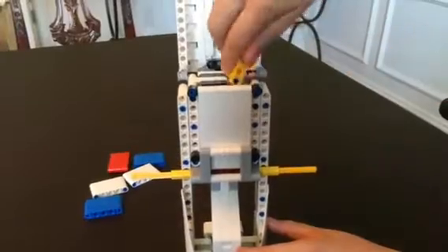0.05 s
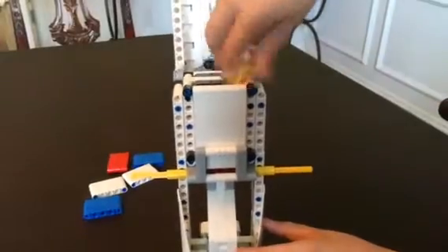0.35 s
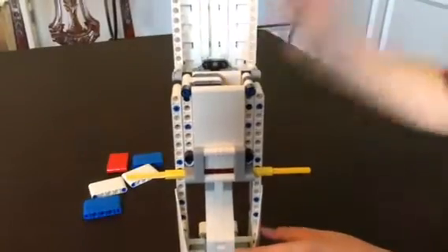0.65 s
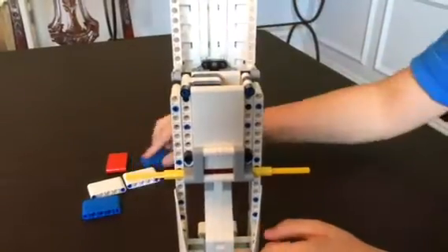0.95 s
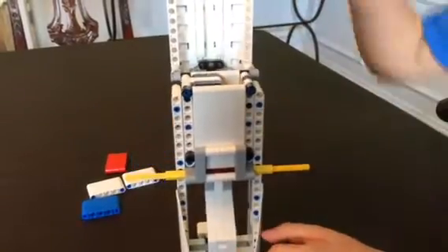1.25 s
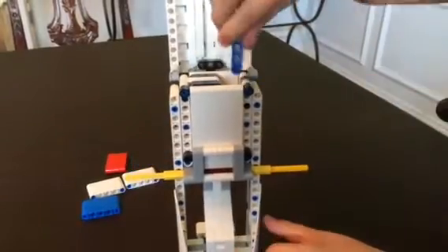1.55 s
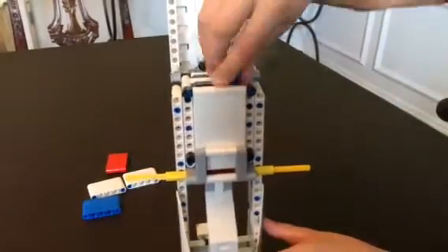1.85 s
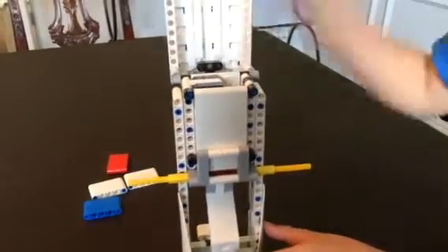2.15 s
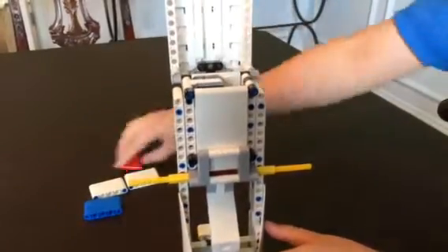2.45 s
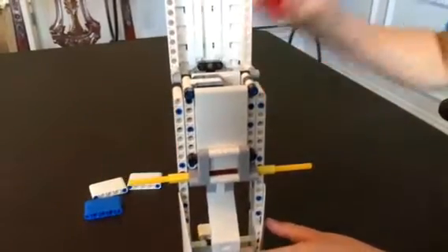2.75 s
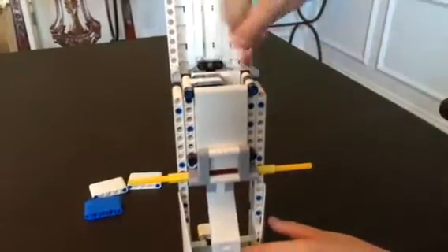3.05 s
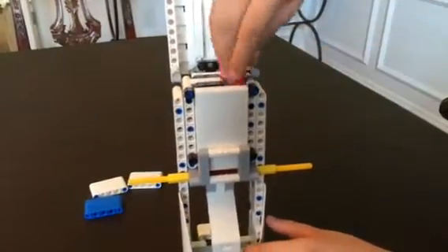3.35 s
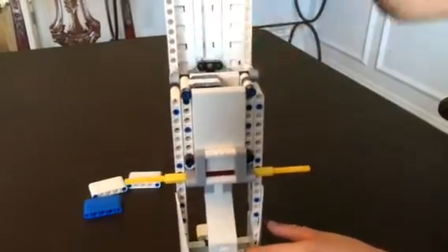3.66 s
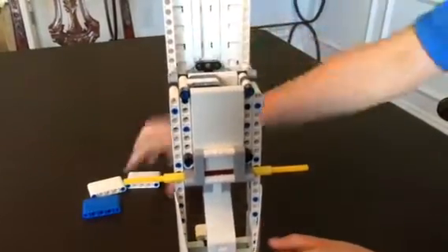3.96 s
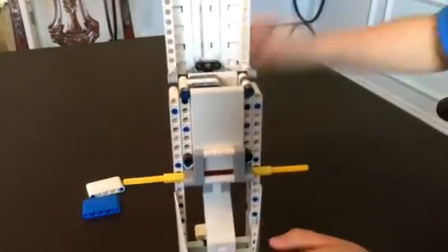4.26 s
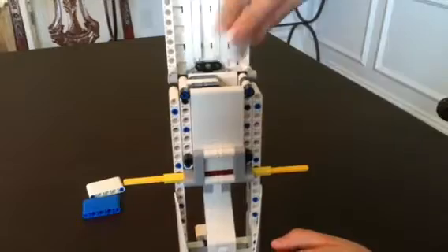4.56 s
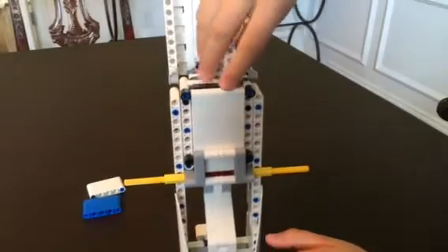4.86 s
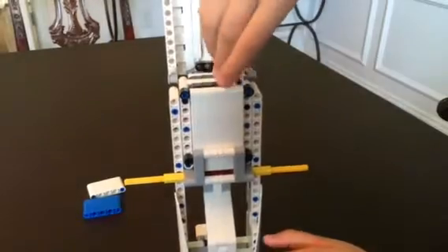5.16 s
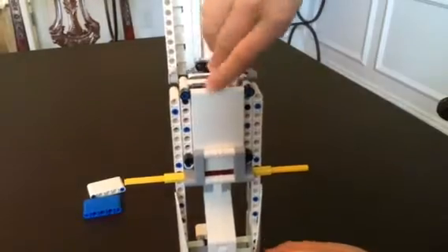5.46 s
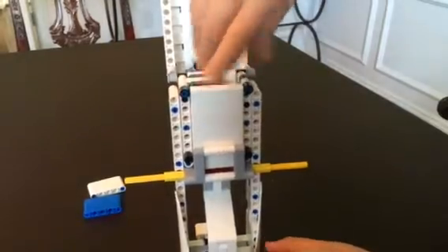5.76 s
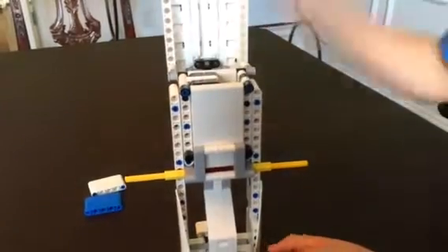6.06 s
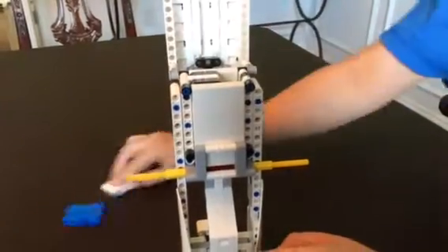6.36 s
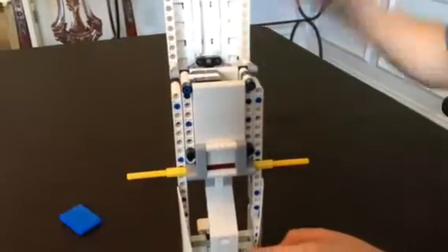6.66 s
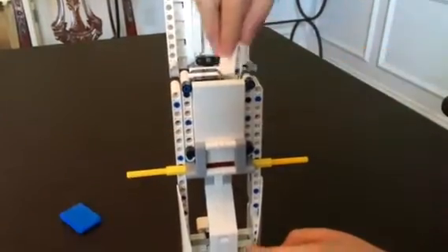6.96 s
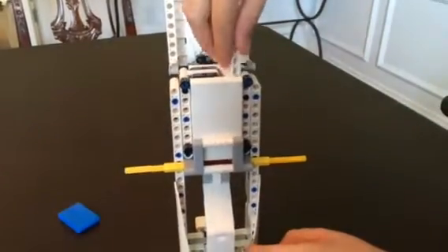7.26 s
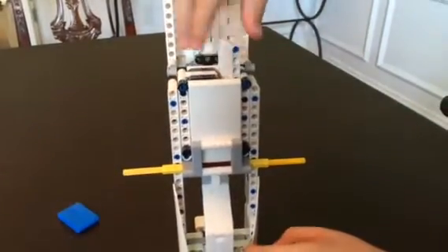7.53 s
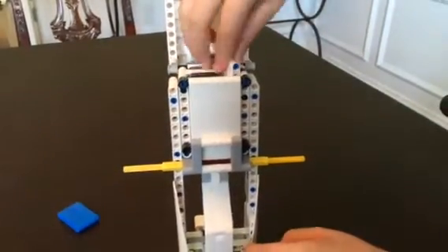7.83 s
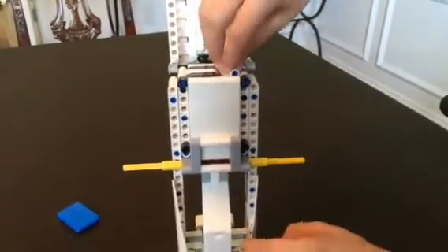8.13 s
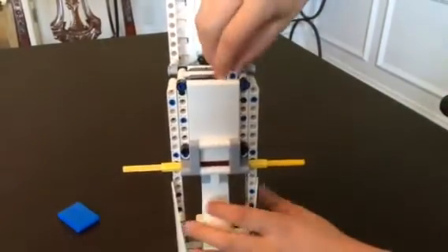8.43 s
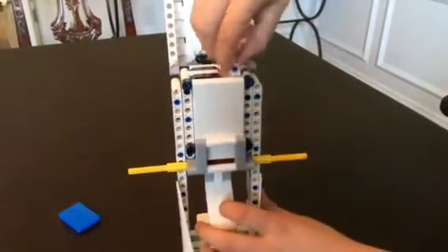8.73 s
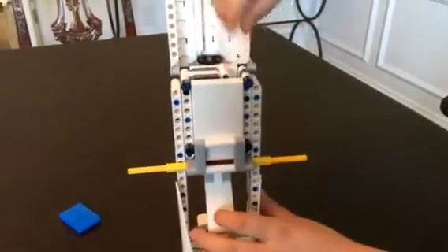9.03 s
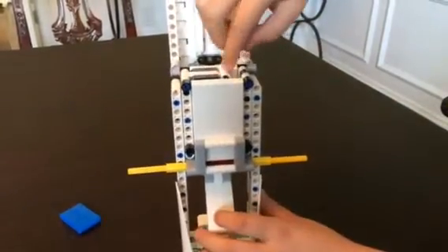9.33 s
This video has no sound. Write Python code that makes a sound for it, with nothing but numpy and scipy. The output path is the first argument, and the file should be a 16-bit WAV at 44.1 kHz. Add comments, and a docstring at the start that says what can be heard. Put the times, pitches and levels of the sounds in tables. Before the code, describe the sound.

Small plastic bricks are picked off a table and dropped one at a time into the chute of a hollow plastic model. Light taps and faint scrapes lead up to four sharp landings, each with a brief clatter. Later a hand drags and the table shudders with a dull, low thump, followed by lighter clicks and a faint rasp. The sounds are close, in a small, slightly live room with a quiet rumble.

```python
"""Plastic bricks down a chute.

Small bricks are picked off a table and dropped one by one into the chute of a plastic model.
Each contact rings the hollow model. Bricks scrape over the table, fingers bump it, and a dragging
hand makes it shudder with a dull thump. A small, live room answers every click over a quiet rumble."""
import sys
import numpy as np
from scipy import signal
from scipy.fft import rfft, irfft, next_fast_len
from scipy.io import wavfile
from scipy.ndimage import uniform_filter1d

SR = 44100
rng = np.random.default_rng(int(sys.argv[2]) if len(sys.argv) > 2 else 0)


def master(y):
    """Save y as 16-bit WAV."""
    cut = np.clip(np.atleast_2d(y).T, -1, 1)
    pcm = np.round(cut * 32767)  # scale
    wavfile.write(sys.argv[1], SR, pcm.astype(np.int16))


N = 418509
TIME = np.arange(N) / SR

# background spectra: f/Hz, level/dB
RUMBLE_SPECTRUM = [(25, -25.5), (85, 0), (150, -7), (350, -9.5), (700, -25.5), (3000, -51)]
HISS_SPECTRUM = [(500, -2.5), (1200, 0.5), (2200, -4), (4100, -10), (15000, -19)]
# hiss, lowest with hands clear of the model: t/s, level/dB
HISS_LEVELS = [(0, -67), (1.45, -69.5), (2.5, -65.5), (3.05, -75), (4.0, -69.5), (5.5, -69.5), (7.5, -68.5),
               (9.49, -66.5)]
# modes of model and bricks: f/Hz, level/dB, t60/s
PLASTIC_MODES = [(534, -3.5, 0.029), (940, -6.5, 0.023), (1205, -8.5, .035), (1400, -10, 0.023),
                 (1792, -7, 0.03), (1965, -10, 0.034), (2243, -6, 0.019), (3330, -12, 0.012),
                 (4270, -3, 0.011), (4780, -5, 0.0099), (5340, 0.5, .01), (5945, -4.5, 0.019),
                 (7270, -12.5, 0.0065), (9230, -7.5, 0.016), (10900, 1, 0.0091)]
# held brick taps plastic: t/s, clack/dB, clack/Hz, tick/dB re clack, tick/Hz, chatter t60/s
BRICK_TAPS = [(0.101, -40.5, 2000, -11.5, 4260, 0.11), (0.117, -39, 1370, -9, 5350, 0.013),
              (0.3155, -39.5, 1890, -6, 4230, 0.061), (0.4607, -40, 1890, -13, 5040, 0.022),
              (0.5081, -37, 1800, -7.5, 3990, 0.033), (0.5426, -45.5, 1640, -5.5, 5030, 0.012),
              (1.5483, -33.5, 1365, 1, 4380, 0.018), (1.813, -30.5, 1160, -14, 4250, 0.026),
              (1.83, -31.5, 1910, -7.5, 5290, 0.033), (1.92, -34, 1820, -14, 4240, 0.046),
              (1.9942, -31.5, 2110, -7.5, 5460, 0.076), (2.0135, -28.5, 1950, -5, 6010, 0.055),
              (3.244, -43, 870, -18, 5340, 0.011), (3.3054, -42.5, 1134, -11, 4730, 0.043),
              (3.3161, -24.5, 2040, -10, 4710, 0.0092), (3.3222, -34.5, 2130, -7, 4870, 0.014),
              (3.5068, -44.5, 2060, -10.5, 4540, 0.045), (3.555, -41, 1880, -5.5, 5170, 0.028),
              (3.67, -41.5, 1900, -12.5, 5010, 0.049), (4.864, -35.5, 1277, -6.5, 5940, 0.019),
              (5.1527, -38, 1850, -8.5, 5450, 0.031), (5.669, -34, 1850, -4.5, 5860, 0.063),
              (6.445, -42.5, 1260, 3, 4090, 0.015), (7.0797, -31, 1340, -7.5, 5790, 0.033),
              (7.1138, -36, 1940, -8.5, 4230, 0.083), (8.188, -41, 1820, -10, 4620, 0.035),
              (8.6188, -29, 1560, 0.5, 5010, 0.022), (8.8147, -42, 1890, -6.5, 6010, 0.013),
              (8.889, -43.5, 1770, -11, 3700, 0.085), (9.0637, -38.5, 1260, -10, 5870, 0.069),
              (9.28, -42.5, 1810, -14, 5090, 0.011)]
# loose brick lands in the chute: t/s, clack/dB, clack/Hz, tick/dB re clack
BRICK_LANDINGS = [(0.6124, -18.5, 2010, 2.5), (.624, -29.5, 1500, -1.5), (.636, -40, 1920, 1),
                  (0.6677, -33, 1550, 0), (0.698, -32, 1760, -1.5), (0.7167, -35.5, 860, 0.5),
                  (2.1232, -21, 1930, -0.5), (2.132, -29, 2250, -0.5), (2.1595, -30.5, 1565, -1.5),
                  (2.1865, -35.5, 1770, -5), (2.199, -33, 1920, -5), (2.2041, -40.5, 1060, 6.5),
                  (3.6848, -24.5, 2250, 2.5), (3.694, -34.5, 1490, -5.5), (3.7183, -37.5, 1914, 0),
                  (3.7387, -32, 1840, 5), (3.752, -36, 1960, 5), (5.7318, -24, 1780, -2.5),
                  (5.7399, -39, 1880, -3), (5.8778, -30, 1770, -2)]
# lifted brick knocks the table: t/s, clack/dB, knock/dB re clack
BRICK_PICKUPS = [(0.8757, -42.5, 1.5), (0.889, -54, 10), (0.9288, -45.5, -8), (0.9365, -36.5, -23),
                 (0.9549, -40, -4), (1.115, -48, -3), (2.5374, -36.5, -10), (2.6361, -32.5, -14),
                 (2.6497, -33.5, -21.5), (4.199, -46, -16), (4.205, -46, -15), (4.246, -45.5, -10),
                 (4.2557, -43.5, -9.5), (6.3767, -32.5, -15.5), (6.553, -41, -2)]
# brick fiddled at the slot: t/s, clack/dB, clack/Hz
BRICK_FIDDLES = [(1.642, -47.5, 1600), (1.9481, -45, 1890), (3.3783, -46, 2160), (3.459, -49, 1970),
                 (3.655, -47.5, 1930), (4.699, -58.5, 1347), (4.835, -50.5, 1160), (4.9766, -54.5, 1070),
                 (5.0742, -52, 1410), (5.1265, -55, 1224), (5.4139, -54, 1236), (5.643, -49, 1572),
                 (5.708, -45, 1910), (7.416, -57, 1130), (7.922, -47, 1290), (8.1596, -45, 1350),
                 (8.998, -48, 1710), (9.075, -41.5, 1150)]
# room tail: f/Hz, level/dB, t60/s
ROOM_BANDS = [(97, -11.5, 0.96), (248, -3.5, 0.24), (576, -3, 0.27), (1100, -8, 0.42), (2083, -6.5, 0.43),
              (3820, -9.5, 0.59), (5800, -12.5, .42), (8000, -11.5, 0.39), (13500, -15.5, .5)]
# plastic rings on one note: t/s, f/Hz, level/dB, t60/s
PLASTIC_PINGS = [(.5635, 4030, -34, 0.02), (.6135, 5980, -18, .018), (.699, 6070, -23, 0.024),
                 (1.335, 2150, -47, 0.041), (2.124, 6180, -22.5, 0.034), (3.3172, 1970, -25.5, 0.015),
                 (3.322, 2290, -52.5, 1), (3.7398, 5996, -8.5, 0.019), (3.967, 10900, -47, 0.013),
                 (6.4445, 4090, -26.5, 0.034), (9.062, 3154, -39.5, 0.036), (9.064, 5830, -36, 0.028)]
# brick tumbles down the chute: t/s, level/dB before trim, t60/s
CHUTE_TUMBLES = [(.626, -39.5, 0.14), (2.134, -38.5, 0.14), (3.688, -35, 0.31), (5.741, -37.5, .25)]
# table bumps: t/s, f/Hz, level/dB before band-pass, t60/s
TABLE_BUMPS = [(.8877, 191.5, -25, 0.027), (.9, 137.6, -11.5, 0.011), (.922, 168, -29.5, 0.052),
               (1.812, 90, -39, 0.24), (2.22, 95, -38.5, 0.086), (2.51, 127, -36.5, 0.047),
               (3.74, 90.1, -34, 0.088), (6.347, 195, -44, 0.1), (6.379, 123.3, -31.5, 0.048),
               (8.692, 416, -32, 0.08), (8.712, 149, -39, 0.04)]
# brick scrapes: t/s at full level, hold/s, level/dB
BRICK_SLIDES = [(0.926, 0.025, -55), (0.992, 0.053, -55.5), (1.83, 0.0085, -44), (2.045, 0.16, -49.5),
                (2.644, 0.0066, -41), (4.18, 0.082, -53.5), (6.416, 0.13, -46), (8.7, 0.019, -41),
                (9.062, 0.043, -52)]
# skin and sleeve pass by: t/s, length/s, level/dB
ARM_BRUSHES = [(1.29, 0.037, -59), (2.444, 0.2, -58.5), (4.07, 0.36, -63.5), (6.295, 0.21, -57),
               (7.941, 0.1, -58), (8.299, 0.37, -61), (9.272, 0.22, -60)]
# friction spectra: f/Hz, level/dB
SLIDE_SPECTRUM = [(150, -25), (450, -11), (1050, -1), (1500, -3.5), (2200, -13.5), (3000, -17.5),
                  (15000, -37.5)]
BRUSH_SPECTRUM = [(200, 2.5), (1500, 2), (3500, -7), (11000, -8.5), (15000, -8.5)]
RASP_SPECTRUM = [(100, -27), (250, -6), (550, -4), (720, -7.5), (1000, 4), (1500, -6.5),
                 (2200, -13.5), (3200, -20), (12000, -37)]
# table top modes: f/Hz, width/Hz, level/dB
TABLETOP_MODES = [(102, 27, 9.5), (123.75, 1.6, 8.5), (169.7, 11, -9), (207.5, 46, 1.5), (278, 39, -11.5),
                  (409, 38, -11), (513, 30, -22)]
# table judders: t/s at full level, hold/s, level/dB, rasp/dB re level
TABLE_SHUDDERS = [(6.758, 0.074, -28.5, -26.5), (8.694, 0.16, -49.5, 0)]
# table booms: t/s at crest, f/Hz, level/dB, half length/s
TABLE_BOOMS = [(6.69, 98, -29, 0.026), (6.735, 171.6, -27, 0.046), (6.767, 240, -28, 0.031),
               (6.79, 126.2, -28.5, 0.041), (6.819, 101, -20.5, 0.062), (6.895, 194.6, -37, 0.036),
               (6.942, 103, -31, 0.028), (8.76, 122.1, -43.5, .08)]
# microphone sensitivity dip: f/Hz, Q, gain/dB
TREBLE_DIPS = [(2800, 12, -2.5)]


def undb(db):
    """Decibels to gain."""
    return 10 ** (np.asarray(db) / 20)


def unit(x):
    """Scale to rms 1."""
    return x / np.sqrt(np.mean(x ** 2) + 1e-20)


def fade(t, t60_s):
    """Exponential decay."""
    return np.exp(-np.log(1000) * t / max(t60_s, 1e-3))


def add(out, s, x):
    """Mix x into out at time s."""
    i = max(int(s * SR), 0)
    out[i:i + len(x)] += x[:max(N - i, 0)]


def band(x, lo_hz, hi_hz, order=3):
    """Causal band-pass."""
    return signal.sosfilt(signal.butter(order, [lo_hz, hi_hz], "band", fs=SR, output="sos"), x)


def peak(x, hz, q, db):
    """Lift or cut a band around hz."""
    return x + (undb(db) - 1) * signal.lfilter(*signal.iirpeak(hz, q, SR), x)


def colour(x, spectrum):
    """Shape x by (f/Hz, level/dB) points; rms 1."""
    hz, db = np.transpose(spectrum)
    size = next_fast_len(N)
    bins_hz = np.maximum(np.fft.rfftfreq(size, 1 / SR), 1)
    gain = undb(np.interp(np.log(bins_hz), np.log(hz), db))
    return unit(irfft(rfft(x, size) * gain, size)[:N])


def drift(rate_hz):
    """Random drift, spread near 1."""
    knots = rng.standard_normal(int(N / SR * rate_hz) + 2)
    return np.interp(TIME * rate_hz, np.arange(len(knots)), knots)


def swell(s, hold_s, db, rise_db_per_s, fall_db_per_s):
    """Gain that reaches db at time s, holds, falls."""
    before_s, after_s = np.maximum(s - TIME, 0), np.maximum(TIME - s - hold_s, 0)
    return undb(db - rise_db_per_s * before_s - fall_db_per_s * after_s)


def grains(per_s, spread_db):
    """Random tiny blows of uneven size; rms 1."""
    blows = (rng.random(N) < per_s / SR) * rng.choice([-1, 1], N)
    return unit(blows * undb(spread_db * np.clip(rng.standard_normal(N), -2, 2)))


def damped_notes(rows, rise_s):
    """One decaying sine per row."""
    out, t = np.zeros(N), np.arange(SR // 2) / SR
    for s, hz, db, t60_s in rows:
        add(out, s, undb(db) * np.sin(2 * np.pi * hz * t) * fade(t, t60_s) * (1 - np.exp(-t / rise_s)))
    return out


def rattle(blows):
    """A train of blows rings the plastic's modes; rms 1."""
    t = np.arange(SR // 20) / SR
    ring = sum((-1) ** k * undb(db) * np.sin(2 * np.pi * hz * t) * fade(t, t60_s)
               for k, (hz, db, t60_s) in enumerate(PLASTIC_MODES))
    return unit(signal.fftconvolve(blows, ring)[:N])


def background(rumble_db=-66, waver_db=1, fidget_db=-2):
    """Indoor rumble, drifting hiss, tiny ticks of the hand-held model."""
    hiss = colour(rng.standard_normal(N), HISS_SPECTRUM) * undb(waver_db * drift(14))
    fidget = undb(fidget_db) * band(rattle(grains(per_s=14, spread_db=5)), 700, 3000, order=2)
    rumble = undb(rumble_db) * colour(rng.standard_normal(N), RUMBLE_SPECTRUM)
    return rumble + (hiss + fidget) * undb(np.interp(TIME, *np.transpose(HISS_LEVELS)))


def click(clack_db, clack_hz, knock_db, tick_db, tick_hz=4930, gap_db=-6, chatter_t60_s=0.03,
          detune=0.021, scatter_db=4.5, ring_db=-1.5, note_db=6.5, rise_s=0.00044):
    """One contact rings the modes while loose pins chatter; hardness sets the band levels."""
    t = np.arange(SR // 10) / SR
    attack = SR // 125
    onset = 1 - np.exp(-t / rise_s)
    hz, db, t60_s = np.transpose(PLASTIC_MODES)[:, :, None]
    # each strike hits another spot: modes shift and change share
    shift, share, polarity = rng.standard_normal((3, len(hz), 1))
    envelopes = np.sign(polarity) * undb(db + scatter_db * share) * np.exp(-np.log(1000) * t / t60_s)
    ring = (envelopes * np.sin(2 * np.pi * hz * (1 + detune * shift) * t)).sum(0)
    chatter = rng.standard_normal(len(t)) * fade(t, chatter_t60_s)
    blow = (undb(ring_db) * ring / ring[:attack].std() + chatter / chatter[:attack].std()) * onset
    # the struck part stresses its own pitch and adds a hollow note
    note = np.sin(2 * np.pi * clack_hz * t) * fade(t, t60_s=0.0082) * onset
    blow = peak(blow, clack_hz, q=1.6, db=19) + undb(note_db) * note / note[:attack].std()
    # the brick ticks higher, above a spectral gap
    blow = peak(blow, tick_hz, q=14, db=5.5)
    blow = peak(blow, hz=2880, q=2.7, db=gap_db)
    edges_hz = (70, 300, 800, 2900, 8000, 15500)
    thud, knock, clack, tick, edge = (band(blow, lo, hi) for lo, hi in zip(edges_hz, edges_hz[1:]))
    edge *= fade(t, t60_s=0.11)  # plastic damps the top first
    parts = [(thud, knock_db - 10), (knock, knock_db), (clack, 0), (tick, tick_db), (edge, tick_db - 9.5)]
    return np.sqrt(attack) * sum(undb(clack_db + re_db) * x / np.linalg.norm(x) for x, re_db in parts)


def contacts(knock_db_per_octave=-12.5, chatter_halving_db=23):
    """Taps, landings, pickups and fiddles, each with its own hardness."""
    out = np.zeros(N)
    for s, db, hz, tick_db, tick_hz, t60_s in BRICK_TAPS:
        knock_db = -17 + knock_db_per_octave * np.log2(hz / 1800)  # lower parts sound hollower
        add(out, s, click(db, hz, knock_db, tick_db, tick_hz, chatter_t60_s=t60_s))
    for s, db, hz, tick_db in BRICK_LANDINGS:
        t60_s = 0.022 * 2 ** (-(db + 34.5) / chatter_halving_db)  # harder is crisper
        add(out, s, click(db, hz, knock_db=-12, tick_db=tick_db, tick_hz=5900, gap_db=-3.5,
                          chatter_t60_s=t60_s))
    for s, db, knock_db in BRICK_PICKUPS:  # the table answers low and dull
        add(out, s, click(db, clack_hz=969, knock_db=knock_db, tick_db=-19))
    for s, db, hz in BRICK_FIDDLES:  # fingers damp the brick
        add(out, s, click(db, hz, knock_db=-13, tick_db=-12.5))
    return out


def room(x, build_s=0.001, echo_s=0.006, echo_db=-15.5):
    """One echo off a near surface, plus a tail that lasts longest in the bass."""
    t = np.arange(int(0.8 * SR)) / SR
    hz = np.array(ROOM_BANDS)[:, 0]
    edges_hz = [40, *np.sqrt(hz[1:] * hz[:-1]), 17000]
    response = np.zeros(len(t))
    for (_, db, t60_s), lo, hi in zip(ROOM_BANDS, edges_hz, edges_hz[1:]):
        shape = fade(t, t60_s) * (1 - np.exp(-t / build_s))
        response += undb(db) * band(rng.standard_normal(len(t)), lo, hi) * shape / np.linalg.norm(shape)
    response[int(echo_s * SR)] += undb(echo_db)
    return signal.fftconvolve(x, response)[:N]


def pings():
    """Model and bricks squeak or ring on single notes."""
    return damped_notes(PLASTIC_PINGS, rise_s=0.0005)


def tumbles(trim_db=-5):
    """Small bounces die away after each drop."""
    gain = np.zeros(N)
    for s, db, t60_s in CHUTE_TUMBLES:
        add(gain, s, undb(db + trim_db) * fade(TIME[:SR // 4], t60_s))
    bounces = grains(per_s=190, spread_db=5)
    return gain * (rattle(bounces) + unit(band(bounces, 1200, 4400, order=2)))


def bumps():
    """Fingers and the model's foot bump the table, which radiates little deep bass."""
    return band(damped_notes(TABLE_BUMPS, rise_s=0.00089), 64, 2504, order=2)


def slides(smooth_db=-8):
    """A sliding brick sticks and slips in dense tiny clicks."""
    friction = grains(per_s=1100, spread_db=3.5) + undb(smooth_db) * rng.standard_normal(N)
    gain = sum(swell(s, hold_s, db, rise_db_per_s=399, fall_db_per_s=445)
               for s, hold_s, db in BRICK_SLIDES)
    return gain * colour(friction, SLIDE_SPECTRUM)


def brushes(flicker_db=2):
    """Skin and sleeve hiss softly as the arm moves."""
    gain = np.zeros(N)
    for s, length_s, db in ARM_BRUSHES:
        add(gain, s, undb(db) * np.sqrt(np.hanning(int(length_s * SR))))
    return gain * undb(flicker_db * drift(47)) * colour(rng.standard_normal(N), BRUSH_SPECTRUM)


def shudders(steady_s=0.039, rumble_db=-6):
    """Uneven hand slips drive the table's low modes; the loud shudder thumps, the faint one rasps."""
    slips = rng.standard_normal(N)
    swing = sum(undb(db) * unit(signal.lfilter(*signal.iirpeak(hz, hz / width_hz, SR), slips))
                for hz, width_hz, db in TABLETOP_MODES)
    # a steady push keeps the swing even
    swing /= np.sqrt(uniform_filter1d(swing ** 2, int(steady_s * SR)) + 1e-9)
    rumble = undb(rumble_db) * unit(band(rng.standard_normal(N), 29, 120, order=2))
    judder = unit(band(swing, 38, 850)) + rumble
    rasp = colour(rng.standard_normal(N), RASP_SPECTRUM)
    out = np.zeros(N)
    for s, hold_s, db, rasp_db in TABLE_SHUDDERS:
        gain = swell(s, hold_s, db, rise_db_per_s=207, fall_db_per_s=128)
        out += gain * (judder + undb(rasp_db) * rasp)
    return out


def booms():
    """The judder locks onto single table modes that swell and sink."""
    return sum(undb(db) * np.exp(-((TIME - s) / half_s) ** 2) * np.sin(2 * np.pi * hz * (TIME - s))
               for s, hz, db, half_s in TABLE_BOOMS)


def scene(directions=3):
    """Bricks, model and table in the room."""
    handling = pings() + tumbles() + slides() + brushes()
    table = bumps() + shudders() + booms()
    # clicks radiate differently in each direction; the walls blend them
    sides = [contacts() + handling + table for _ in range(directions)]
    reflected = sum(room(side) for side in sides) / np.sqrt(directions)
    return (sides[0] + reflected + background())[None]


def record(dry, peak_limit=0.63, top_hz=15500):
    """Microphone treble dip, soft limiter, steep low-pass."""
    heard = dry
    for hz, q, db in TREBLE_DIPS:
        heard = peak(heard, hz, q, db)
    heard = peak_limit * np.tanh(heard / peak_limit)
    return signal.sosfilt(signal.ellip(8, 0.2, 70, top_hz, fs=SR, output="sos"), heard)


dry = scene()
out = record(dry)
master(out)
```